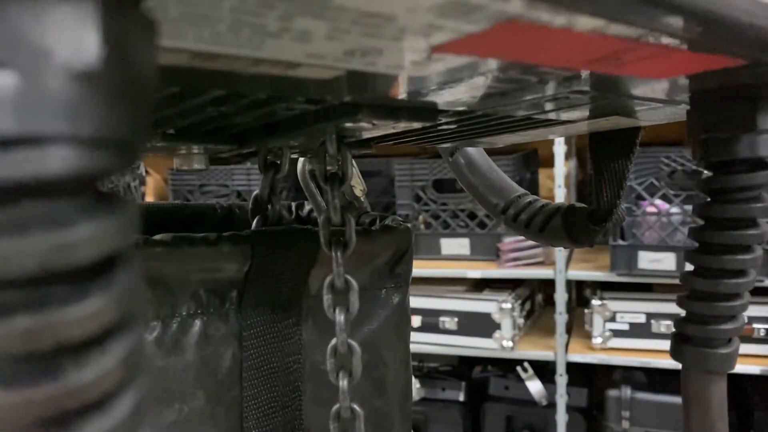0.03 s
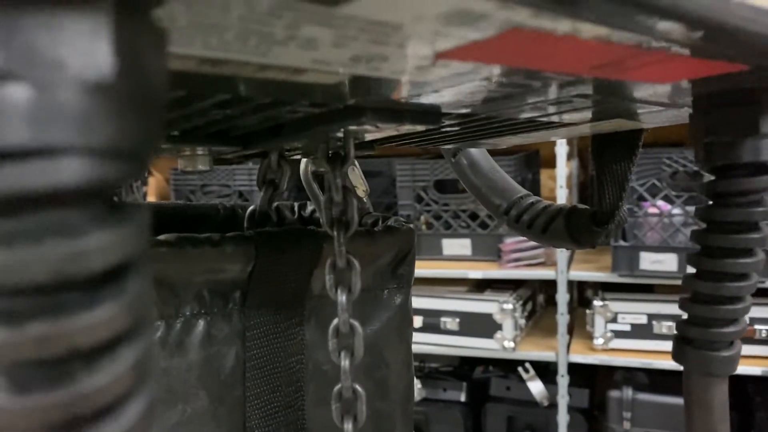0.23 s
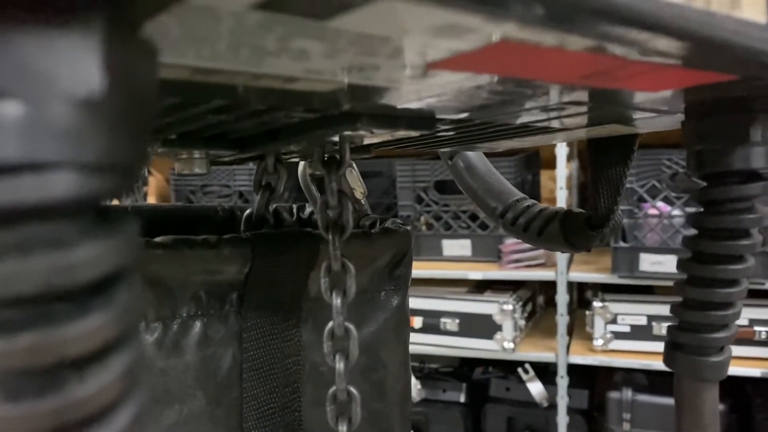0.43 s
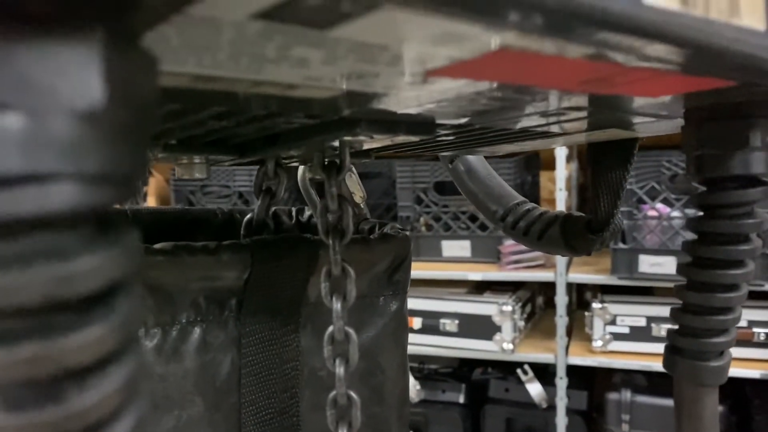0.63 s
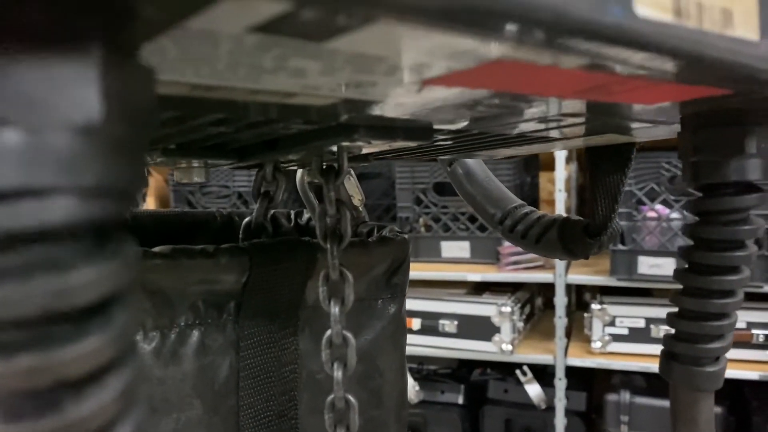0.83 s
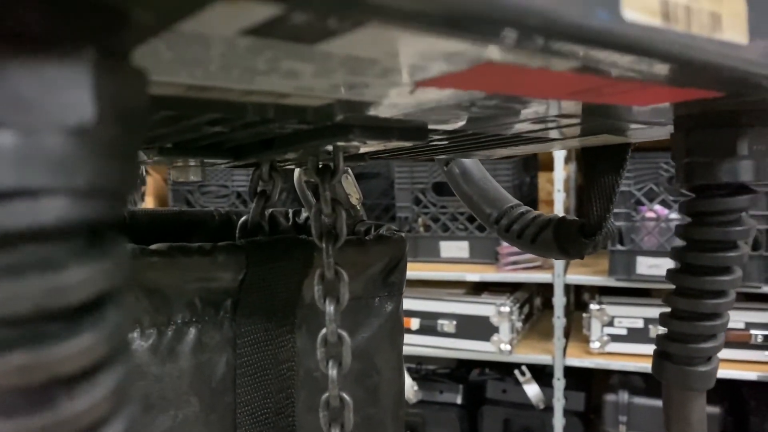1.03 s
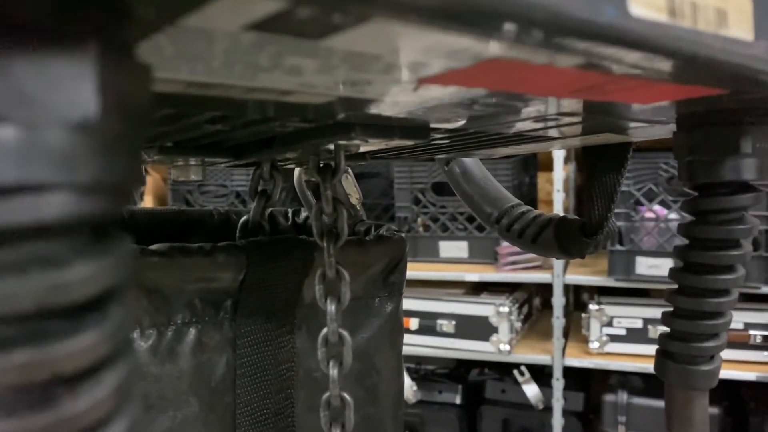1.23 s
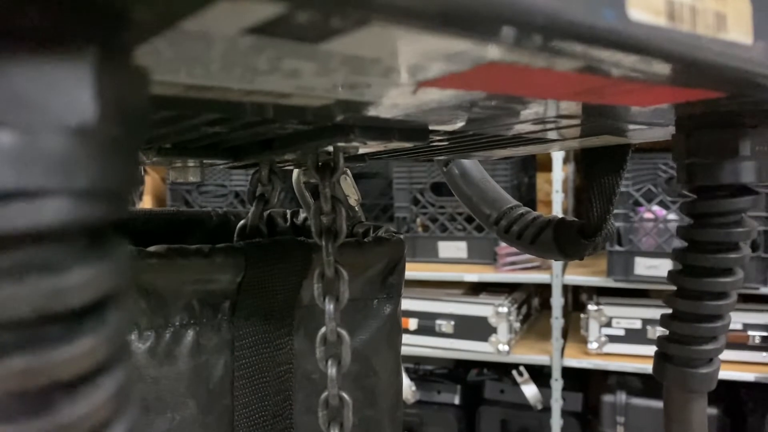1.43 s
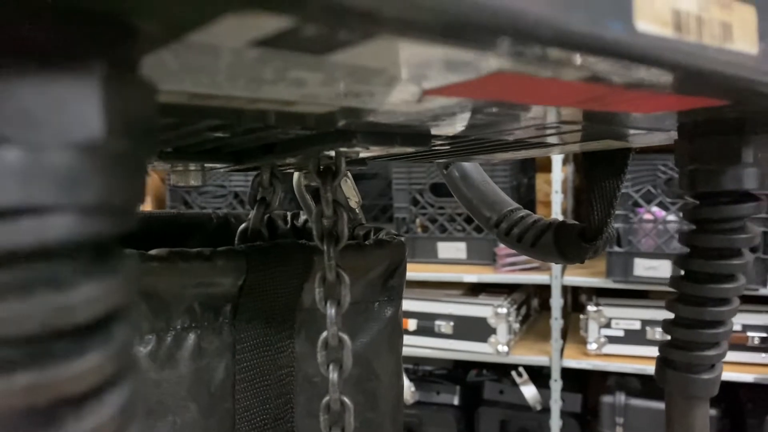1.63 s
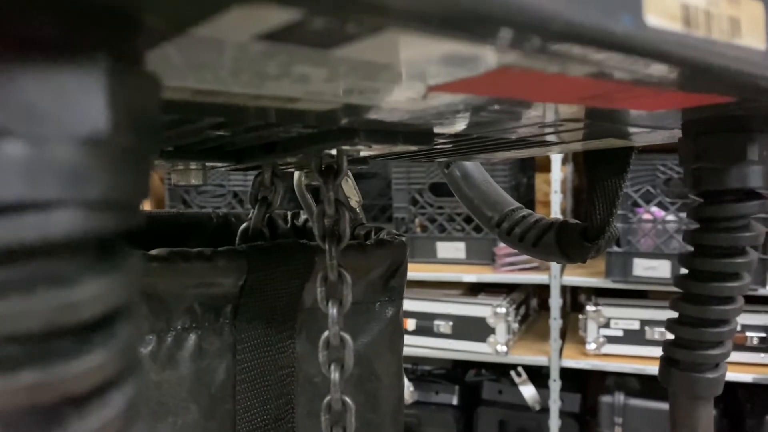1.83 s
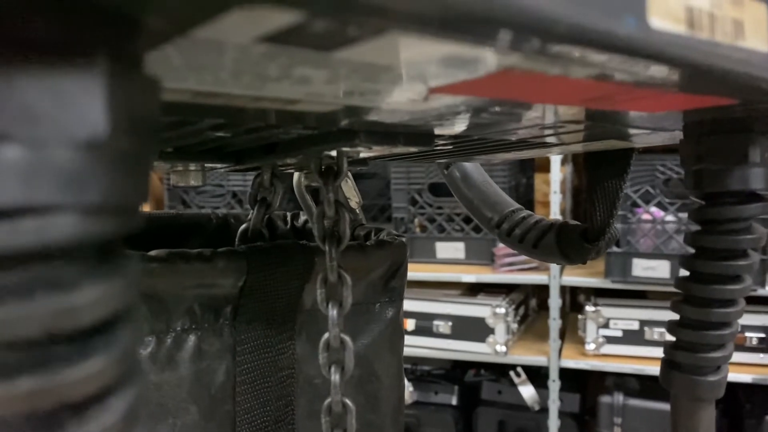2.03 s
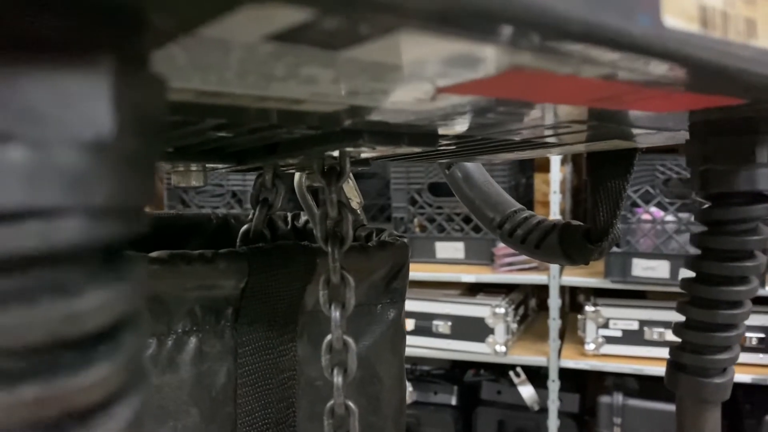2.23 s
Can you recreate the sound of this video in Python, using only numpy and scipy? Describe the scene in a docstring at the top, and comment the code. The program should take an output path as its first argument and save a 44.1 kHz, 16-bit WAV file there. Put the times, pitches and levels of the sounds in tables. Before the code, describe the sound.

Heard from just underneath, a chain hoist starts and stops three times, about a second apart, with dry switch ticks, metallic clacks and a thin motor whine. Between bumps, the storeroom's ventilation rumbles under faint distant knocks.

```python
"""A storeroom, right under an electric chain hoist that is switched on briefly three times.
Its switch ticks and its brake clacks, the gears grind and make the metal housing ring,
and the motor's electronics whine near 10 kHz. In between there is ventilation rumble,
thin electrical tones, a few chain rubs and far knocks, and one short squeak."""
import sys
import numpy as np
from scipy import signal
from scipy.fft import rfft, irfft, next_fast_len
from scipy.io import wavfile
from scipy.ndimage import uniform_filter1d

SR = 44100
rng = np.random.default_rng(int(sys.argv[2]) if len(sys.argv) > 2 else 0)


def generate_wav(sig):
    """Save sig (samples, or channels by samples) to the path in sys.argv[1] as 16-bit PCM at SR."""
    pcm = np.round(np.clip(np.atleast_2d(sig).T, -1, 1) * 32767).astype(np.int16)
    wavfile.write(sys.argv[1], SR, pcm)


N = 100018
TIME = np.arange(N) / SR


def amp(db):
    return 10 ** (np.asarray(db, float) / 20)


def unit_rms(x):
    return x / np.sqrt(np.mean(x ** 2) + 1e-20)


def look_up(curve, hz):
    f, value = np.transpose(curve)
    return np.interp(np.log(hz + 1), np.log(f + 1), value)


def add(mix, start_s, sound):
    part = mix[round(start_s * SR):][:len(sound)]
    part += sound[:len(part)]


def filtered(x, gain):
    """Turn each frequency up or down by gain(hz)."""
    size = next_fast_len(N + 4096)
    return irfft(rfft(x, size) * gain(np.fft.rfftfreq(size, 1 / SR)), size)[..., :N]


def shaped(x, spectrum):
    return filtered(x, lambda hz: amp(look_up(spectrum, hz)))


def resonate(x, hz, width):
    """Keep the sound near one pitch, which may move."""
    turn = np.exp(2j * np.pi * np.cumsum(hz * np.ones(len(x))) / SR)
    keep = np.exp(-np.pi * width / SR)
    return 2 * (turn * signal.lfilter([1 - keep], [1, -keep], x / turn)).real


def band(x, hz, width):
    return resonate(resonate(x, hz, width), hz, width)


def strike(hits, modes, rise_s=1e-4):
    """Each hit starts fading notes; low ones build up more slowly (rise_s holds at 200 Hz)."""
    t = np.arange(SR // 2) / SR
    ring = 0
    for hz, db, fade_s in modes:
        rise = (1 - np.exp(-t / (rise_s * (200 / hz) ** 2))) ** 2
        ring += rise * amp(db - 60 * t / fade_s) * np.sin(2 * np.pi * hz * t)
    return signal.oaconvolve(hits, ring)[:N]


def stereo(shared, right_only, lead, balance, likeness=((20, 1), (20000, 1))):
    """Left and right differ in level and timing; right_only fills in where likeness is below 1."""
    alike = lambda hz: np.clip(look_up(likeness, hz), 0, 1)
    tilt = lambda hz: amp(look_up(balance, hz) / 2) * np.exp(.5j * look_up(lead, hz))
    right = filtered(shared, lambda hz: alike(hz) / tilt(hz))
    right += filtered(right_only, lambda hz: np.sqrt(1 - alike(hz) ** 2) / tilt(hz))
    return np.array([filtered(shared, tilt), right])


def follow(runs, column):
    """Trace a table column through time; between motor runs it is -120 (silence)."""
    out = np.full(N, -120.)
    for rows in map(np.array, runs):
        inside = (TIME >= rows[0, 0]) & (TIME <= rows[-1, 0] + .002)
        out[inside] = np.interp(TIME[inside], rows[:, 0], rows[:, column])
    return out


# Rumble of moving air: f/Hz, relative level/dB
AIR_SPECTRUM = [(20, -60), (52, -6), (70, 1), (207, -13.5), (452, -19.5), (767, -24), (1340, -24.5),
                (1750, -20), (1900, -25.5), (2700, -29), (3500, -37.5), (4400, -37), (5000, -31.5),
                (5500, -35), (5900, -34.5), (6250, -38.5), (8410, -45.5), (9930, -44), (11700, -71),
                (13500, -33.5), (15500, -65)]
# Electrical tone and its overtones: multiple of the pitch, level/dB, depth of slow swell
ELECTRIC_TONES = [(1, -53, .1), (3, -68, .45), (4, -73, .4)]
# Fuzzy fan tones: f/Hz, width/Hz, level/dB
FAN_TONES = [(71.2, 7.4, -48), (114, 43, -48.5), (857, 16, -58), (1499, 33, -63), (1569, 38, -58.5)]
# How far the left side is ahead: f/Hz, phase/rad
AIR_LEFT_LEAD = [(20, 0.5), (260, -1), (1640, -8), (15200, -19.5)]
# How much louder the left side is: f/Hz, level/dB
AIR_LEFT_LOUDER = [(60, 1.5), (240, -1), (950, 0), (3770, 8), (15000, 0.5)]
# How alike the two sides are: f/Hz, likeness (1 = same)
AIR_LIKENESS = [(180, 0.96), (550, 0.033), (1650, 0.68), (4970, 0.11)]

def ventilation(rumble_db=-41.5, tone_hz=1311.3):
    """Air rumbles, fans add fuzzy notes and a thin electrical tone slowly swells and sinks."""
    rumbles = [amp(rumble_db) * unit_rms(shaped(z, AIR_SPECTRUM)) for z in rng.standard_normal((2, N))]
    swell = unit_rms(resonate(rng.standard_normal(N), hz=2.6, width=1.6))
    tones = sum(np.sqrt(2) * amp(db) * (1 + depth * swell) * np.sin(2 * np.pi * k * tone_hz * TIME)
                for k, db, depth in ELECTRIC_TONES)
    fans = sum(amp(db) * unit_rms(resonate(rng.standard_normal(N), hz, width))
               for hz, width, db in FAN_TONES)
    return (stereo(*rumbles, AIR_LEFT_LEAD, AIR_LEFT_LOUDER, AIR_LIKENESS)
            + stereo(tones + fans, np.zeros(N), AIR_LEFT_LEAD, AIR_LEFT_LOUDER))


# Rubs and knocks: t/s, level/dB, rise/s, time to fade 60 dB/s, f/Hz, width/Hz, relative hiss/dB
FAR_NOISES = [(.17, -39, 0.07, 0.44, 1980, 1660, -3), (0.7, -43.5, 0.0048, 0.43, 2900, 2200, 0.5),
              (2.069, -46.5, 0.05, 0.43, 2370, 1920, 2.5)]
# One squeak: t/s, length/s, f/Hz, width/Hz, level/dB
FAR_SQUEAK = (.401, .038, 6800, 500, -51)

def far_noises():
    """Chain rubs and far knocks, heard mostly as their echo, and one short squeak."""
    t, out = np.arange(SR // 2) / SR, np.zeros((2, N))
    for start, db, rise, fade, hz, width, hiss_db in FAR_NOISES:
        envelope = np.minimum(t / rise, 1) * amp(db - 60 * np.maximum(t - rise, 0) / fade)
        for side in out:
            grains = rng.standard_normal(len(t))
            grains *= 1 + rng.random(len(t) // 128 + 1).repeat(128)[:len(t)]
            noise = unit_rms(band(grains, hz, width)) + amp(hiss_db) * unit_rms(grains)
            add(side, start, envelope * noise)
    start, length, hz, width, db = FAR_SQUEAK
    squeak = amp(db) * unit_rms(band(rng.standard_normal(len(t)), hz, width))
    for side in out:
        add(side, start, squeak * np.clip(np.minimum(t, length - t) / .003, 0, 1))
    return out


# How long the room rings: f/Hz, time to fade 60 dB/s
ECHO_FADE = [(200, 0.23), (1000, 0.44), (4000, 0.46), (12000, 0.2)]

def room_echo(sound, level_db=-16.5):
    """Each ear gets its own echo, in which each frequency dies away at its own speed."""
    hz, t, noise = signal.stft(rng.standard_normal((2, SR // 2)), SR, nperseg=256)
    tail = signal.istft(noise * amp(-60 * t / look_up(ECHO_FADE, hz)[:, None]), SR, nperseg=256)[1]
    tail /= np.linalg.norm(tail[0])
    return amp(level_db) * signal.fftconvolve(sound[None], tail, axes=1)[:, :N]


# Tone pairs around the switching pitch, nearest first: relative level/dB below it, above it
WHINE_PAIRS = [(-3, -4), (0, -7), (-11, -10), (0, -10), (-3, -8), (-11, -11), (-12, -16), (-20, -19),
               (-21, -15)]
# When the motor pulls: on t/s, off t/s, fade/s, level/dB
MOTOR_RUNS = [(-.01, .048, .03, -22.5), (1.204, 1.278, .006, -25), (2.243, 2.3, .01, -24)]

def motor_whine(switch_hz=9972, mains_hz=59.8, idle_db=-62.5, hiss_width_hz=1250):
    """The motor's power switches very fast: a faint buzzing whine at rest, a pulsing hiss under load."""
    sweep, sweep_start = .055, .22  # shares of a mains cycle; the tones line up into a repeating sweep
    tones = 0
    for k, (below_db, above_db) in enumerate(WHINE_PAIRS, start=1):
        for side, db in ((-1.1, below_db), (1, above_db)):
            hz = switch_hz + side * k * mains_hz
            phase = np.pi * (sweep * k ** 2 + 2 * sweep_start * side * k)
            tones += amp(db) * np.cos(2 * np.pi * hz * TIME + phase)
    tones = unit_rms(tones)
    hiss = unit_rms(band(rng.standard_normal(N), 10700, 2 * hiss_width_hz))
    puffs = np.exp(2 * np.cos(2 * np.pi * (mains_hz * TIME - .8)))  # one per mains cycle
    buzz = unit_rms(puffs * band(hiss, switch_hz, hiss_width_hz))
    pulling = unit_rms(hiss * (1 + .33 * np.cos(4 * np.pi * mains_hz * TIME)) + 1.1 * tones)
    power = sum(amp(db) * np.clip((TIME - on) / .0041, 0, 1) * np.exp(-np.maximum(TIME - off, 0) / fade)
                for on, off, fade, db in MOTOR_RUNS)
    return amp(idle_db) * (tones + amp(-12) * buzz) + power * pulling


# Gear teeth meeting in the first two runs: t/s, f/Hz (teeth per second), relative level/dB
TOOTH_RUNS = [
    [(0, 185.7, -34), (.02, 268.9, -21.5), (.035, 420.4, -18), (.047, 593.2, -5), (.058, 748.3, -4.5),
     (.066, 794.3, -4), (.085, 817, -18), (.098, 843, -23.5), (.118, 254.7, -18.5)],
    [(1.21, 143.3, -18), (1.24, 262.5, -30), (1.262, 330.7, -22.5), (1.275, 422, -20.5),
     (1.285, 392.3, -39), (1.31, 188, -26.5)],
]

def gear_teeth(housing_hz=785, width_hz=80, roughness=.64):
    """The teeth make a gliding note that sings out where it or an overtone meets the housing's pitch."""
    wobble = unit_rms(uniform_filter1d(uniform_filter1d(rng.standard_normal(N), 120), 120))
    tooth_hz = np.maximum(follow(TOOTH_RUNS, column=1), 0)
    phase = 2 * np.pi * np.cumsum(tooth_hz) / SR + roughness * wobble
    note = sum(amp(db) * np.sin(k * phase) for k, db in enumerate([-1.5, -4, 1, -36], start=1))
    note *= amp(follow(TOOTH_RUNS, column=2))
    low_hum = filtered(note, lambda hz: 1 / (1 + (hz / 633) ** 4))
    singing = resonate(resonate(note, housing_hz, 4 * width_hz), housing_hz, width_hz)
    return low_hum + amp(8.5) * singing


# Tone colour of the grinding: f/Hz, relative level/dB
GRIND_SPECTRUM = [(100, -19), (218, 9), (614, 8), (791, -31), (1520, 6.5), (2320, 10), (3250, 0),
                  (8410, -4), (10200, 0.5), (15500, -13)]
# Grit and chain rattle in each run: t/s, relative level/dB
GRIND_RUNS = [
    [(0, -36.5), (.02, -36), (.045, -23), (.06, -17), (.09, -16), (.105, -14), (.125, -26), (.155, -40.5),
     (.2, -45)],
    [(1.158, -67), (1.17, -32.5), (1.2, -34), (1.208, -15), (1.24, -27.5), (1.265, -40), (1.285, -22.5),
     (1.33, -42.5), (1.4, -68)],
    [(2.228, -31), (2.24, -33.5), (2.245, -8), (2.267, -28.5)],
]
# Notes of the housing, also struck by the brake: f/Hz, relative level/dB, time to fade 60 dB/s
HOUSING_NOTES = [(780, -9, 0.036), (796, -29, 0.49), (903.5, -6, 0.1), (1048.5, -5, 0.075),
                 (1208, -18.5, 0.089), (1404, -5.5, 0.055), (1745, -3.5, 0.078), (2338, -12, 0.1),
                 (2416, -14, 0.095), (5010, -12, 0.044)]

def gear_grind(grains_per_s=1500, detune=.012, detune_step_s=.015):
    """Tiny gritty hits shake the housing, whose notes waver as the load swings."""
    sizes = amp(-.5 * np.minimum(rng.exponential(1, N), 4))
    grit = sizes * (rng.random(N) < grains_per_s / SR) * rng.choice([-1, 1], N)
    scrape = unit_rms(shaped(grit, GRIND_SPECTRUM))
    ring = 0
    for hz, db, fade_s in HOUSING_NOTES[2:]:
        wander = np.interp(TIME / detune_step_s, np.arange(1000), rng.standard_normal(1000))
        ring += amp(db) * resonate(grit, hz * (1 + detune * wander), 4 / fade_s)
    return amp(follow(GRIND_RUNS, column=1) + 1) * unit_rms(scrape + .68 * unit_rms(ring))


# Ticks of the power switch: t/s, level/dB, f/Hz
SWITCH_TICKS = [(1.1592, -30, 5502), (1.171, -34, 2392), (1.1934, -23, 4495), (2.2285, -28.5, 4268)]

def switch_ticks(noise, fall_s=.0008):
    """The switch contacts close with thin, dry ticks, each a tiny puff of noise."""
    t, out = np.arange(2000) / SR, np.zeros(N)
    envelope = np.e * t / fall_s * np.exp(-t / fall_s)
    for start, db, hz in SWITCH_TICKS:
        puff = noise[round(start * SR) - len(t):][:len(t)]
        body = unit_rms(resonate(puff, hz, width=2600))
        treble = unit_rms(np.diff(puff, prepend=0))
        add(out, start, amp(db) * envelope * (body + amp(-3) * treble))
    return out


# Clacks, with relative levels: t/s, crack/dB, thump/dB, housing ring/dB, rattle length/s, snap/dB
BRAKE_CLACKS = [(0.0471, -15, -49, -20.5, 0.0074, -21), (0.0949, -8, -16.5, -11, 0.00635, -8),
                (1.206, -6.5, -8, -26, 0.00433, 2.5), (1.2135, -12.5, -17, -8, 0.0033, -28),
                (1.2318, -20.5, -33, -19, 0.0057, -32), (1.283, -9, -13, -49, 0.00375, -9),
                (2.2424, -9.5, -3.5, -34, 0.00446, 7), (2.2506, -7, -2.5, -34, 0.003, 2.5),
                (2.2655, -20, -13, -30, 0.0061, -5)]
# Tone colour of the crack: f/Hz, relative level/dB
CRACK_SPECTRUM = [(120, -40), (300, -30), (600, -51), (950, 7), (1900, -19), (2600, 3), (5050, -8),
                  (7500, -4.5), (15500, -5.5)]
# Low notes of the frame and chain bag: f/Hz, relative level/dB, time to fade 60 dB/s
FRAME_NOTES = [(219, 8.5, 0.12), (179.3, -2.5, 0.099), (310.3, 3, 0.05), (123, 1.5, 0.078)]

def brake_clacks(noise, rise_s=.0011, fall_s=.0018, thump_lag_s=.0015, snap_hz=7580):
    """The brake hits with a short, bright rattle that rings the housing; a low thump follows."""
    t = np.arange(2000) / SR
    rattles, snaps, blows, thumps = np.zeros((4, N))
    for start, crack_db, thump_db, ring_db, length, snap_db in BRAKE_CLACKS:
        envelope = np.minimum(t / rise_s, 1) ** 2 * np.exp(-np.maximum(t - length, 0) / fall_s)
        add(rattles, start - rise_s / 2, amp(crack_db) * envelope)
        add(snaps, start - rise_s / 2, amp(snap_db) * envelope ** 2)
        add(blows, start, amp([ring_db]))
        add(thumps, start + length + thump_lag_s, amp([thump_db]))
    crack = rattles * unit_rms(shaped(noise, CRACK_SPECTRUM))
    snap = snaps * unit_rms(filtered(noise, lambda hz: 1 / (1 + (snap_hz / (hz + 1)) ** 8)))
    hollow = sum(amp(db + 15) * resonate(noise * rattles, hz, width=125) for hz, db, _ in HOUSING_NOTES)
    ring = strike(blows, HOUSING_NOTES)
    thump = strike(thumps, FRAME_NOTES, rise_s=.0048)
    return crack + snap + hollow + ring + thump


# How far the hoist's left side is ahead: f/Hz, phase/rad
HOIST_LEFT_LEAD = [(20, 0), (300, .15), (780, .9), (1380, -.9), (2500, -6), (6100, -5.7), (11000, -14.1),
                   (15200, -21.4)]
# How much louder its left side is: f/Hz, level/dB
HOIST_LEFT_LOUDER = [(180, 1.5), (550, 3), (1650, 7), (4970, 9), (15000, -5.5)]
# How alike its two sides are: f/Hz, likeness (1 = same)
HOIST_LIKENESS = [(300, 1), (1000, .75), (3000, .75), (8000, .97)]

def scene():
    """The hoist close overhead, its echo and the background, in stereo."""
    noise = rng.standard_normal(N)
    hoist = brake_clacks(noise) + switch_ticks(noise) + gear_grind() + gear_teeth() + motor_whine()
    far_side = np.pad(hoist, (150, 0))[:N]  # sound from the back of the housing arrives later
    direct = stereo(hoist, far_side, HOIST_LEFT_LEAD, HOIST_LEFT_LOUDER, HOIST_LIKENESS)
    return direct + room_echo(hoist) + ventilation() + far_noises()


# Tone colour of the microphone: f/Hz, level/dB
MIC_COLOUR = [(20, -2), (3600, 2.5), (5100, 4), (7000, 2.5), (8350, -2), (9200, 0), (10800, 1),
              (12100, -11), (13800, -6.5), (16000, -7.5)]

def record(dry, loud_db=-26, recover_db_per_s=113, ceiling=.95, top_hz=15660):
    """The microphone colours the sound, turns down after loud hits, rounds peaks and cuts the top."""
    x = shaped(dry, MIC_COLOUR)
    power_db = 10 * np.log10(abs(uniform_filter1d((x ** 2).mean(0), 400)) + 1e-12)
    recovery = TIME * recover_db_per_s
    held_db = np.maximum.accumulate(power_db + recovery) - recovery
    excess_db = np.maximum(held_db - loud_db, 0)
    x = x / amp(.12 * uniform_filter1d(excess_db, 200))
    x = x / (1 + abs(x / ceiling) ** 8) ** (1 / 8)
    lowpass = signal.firwin(511, top_hz, window=("kaiser", 9), fs=SR)
    return signal.oaconvolve(x, lowpass[None], "same")


dry = scene()
out = record(dry)
generate_wav(out)
```